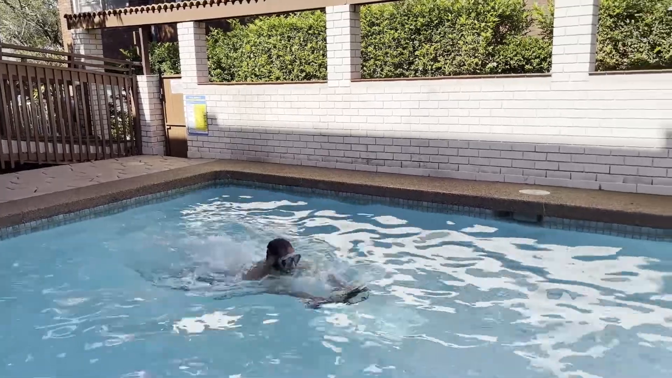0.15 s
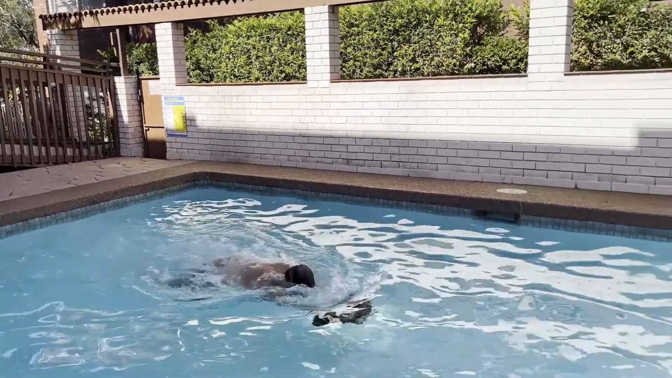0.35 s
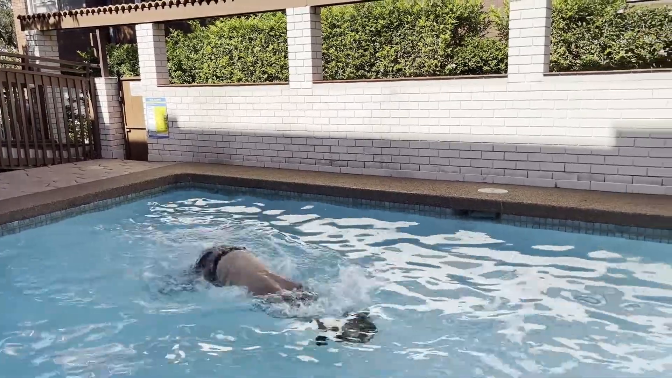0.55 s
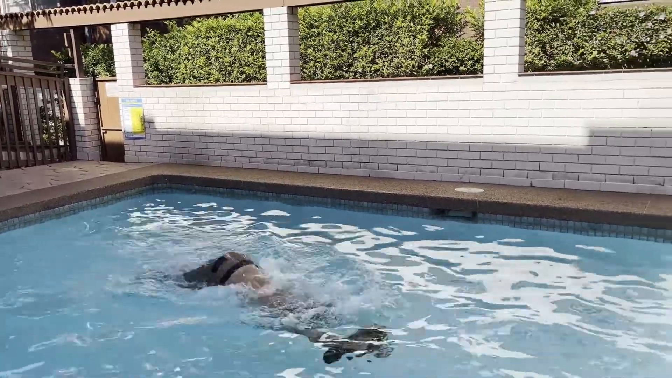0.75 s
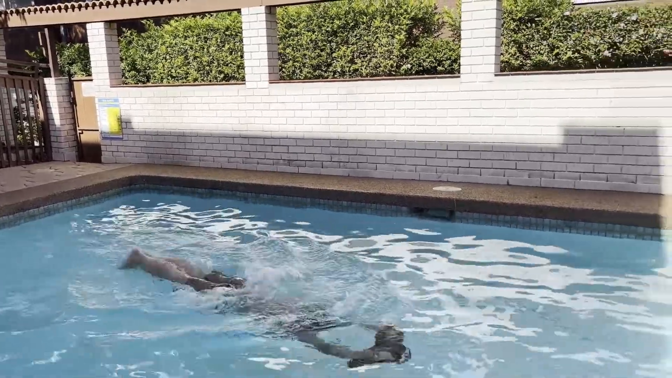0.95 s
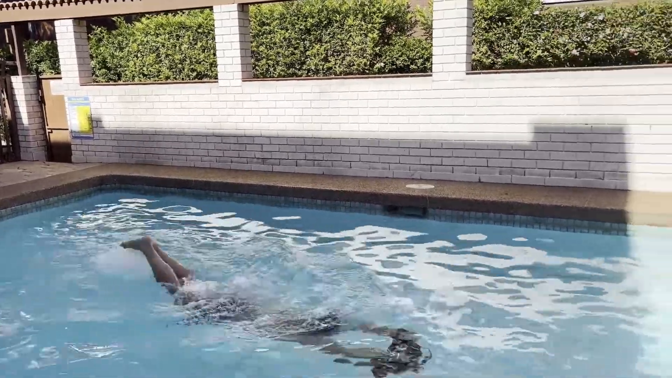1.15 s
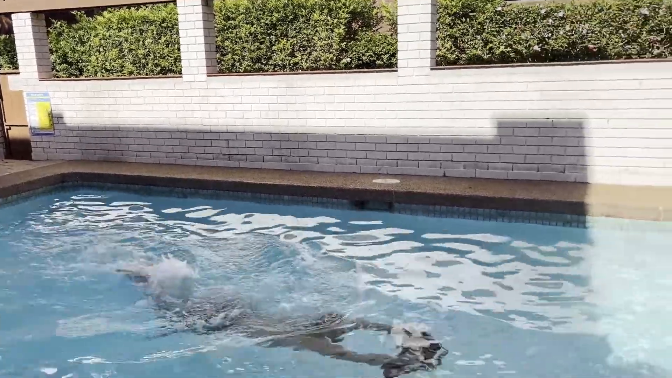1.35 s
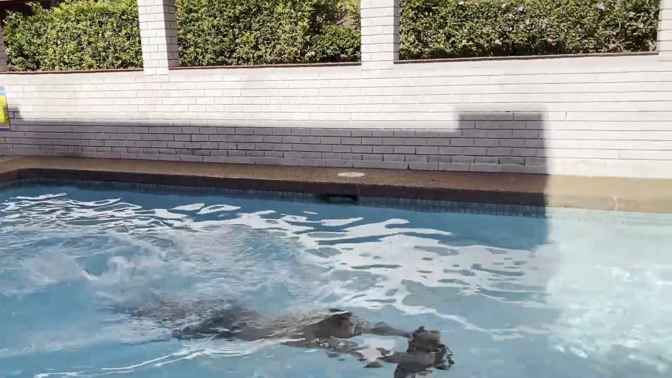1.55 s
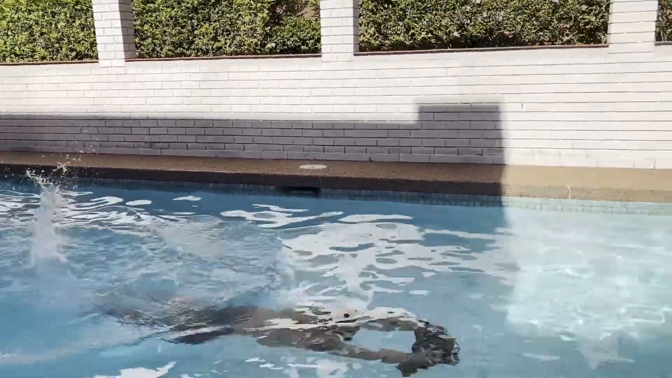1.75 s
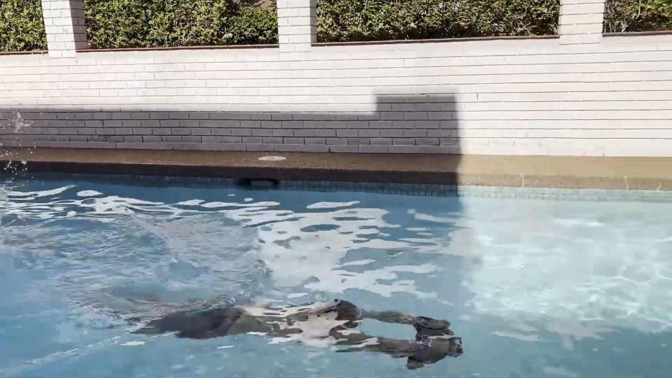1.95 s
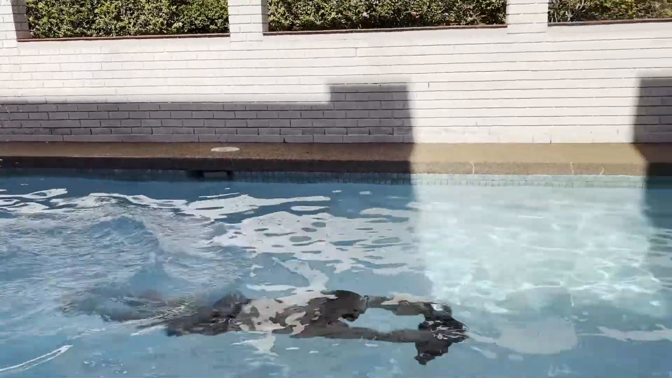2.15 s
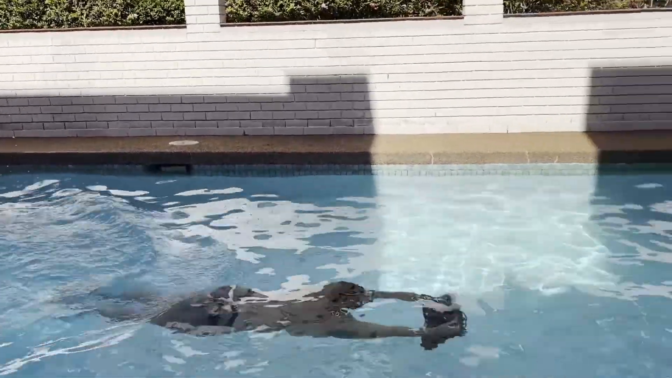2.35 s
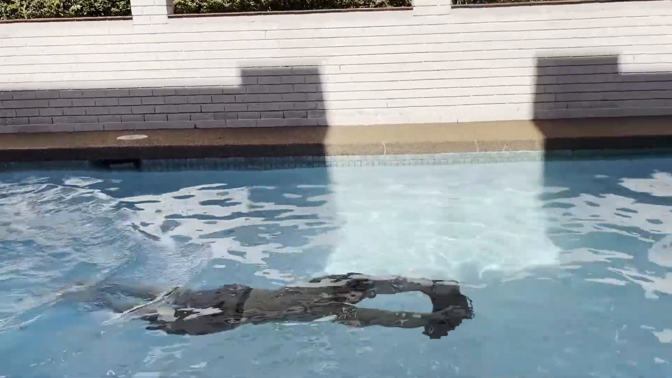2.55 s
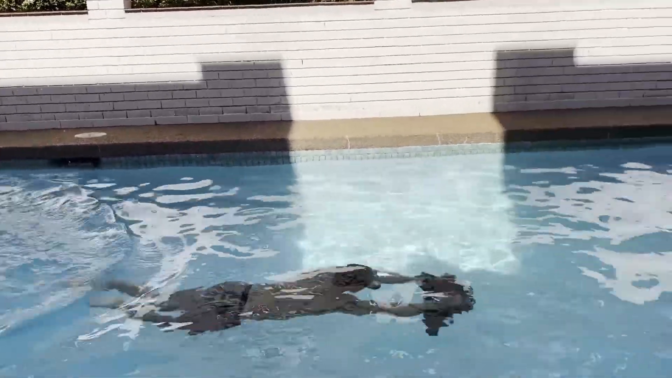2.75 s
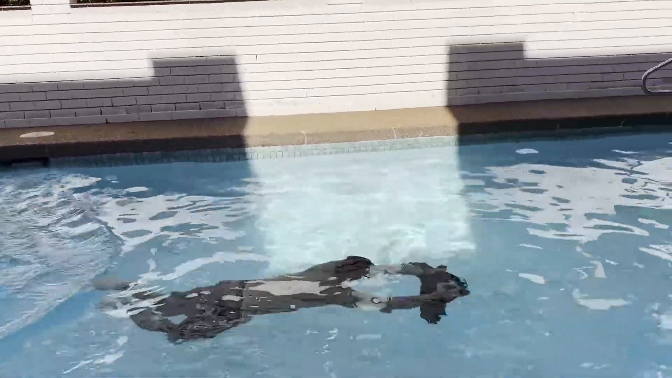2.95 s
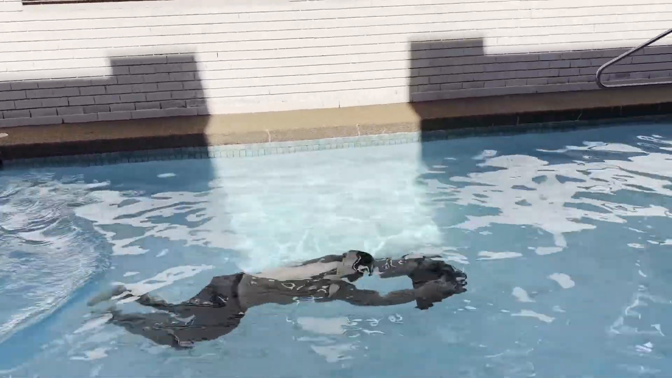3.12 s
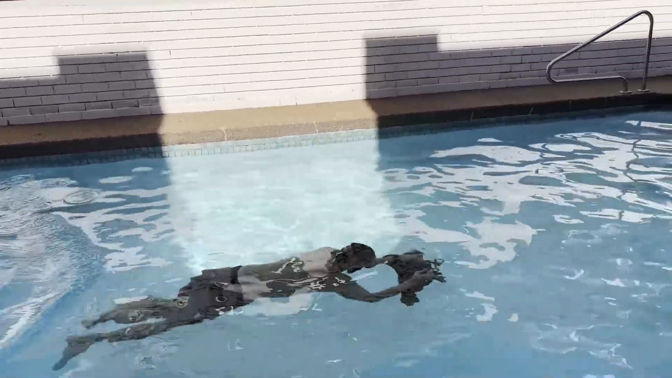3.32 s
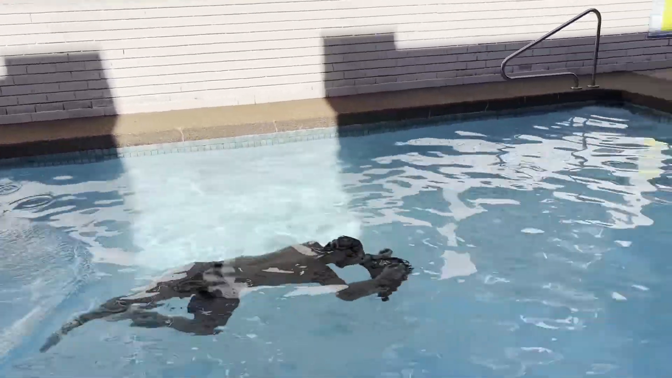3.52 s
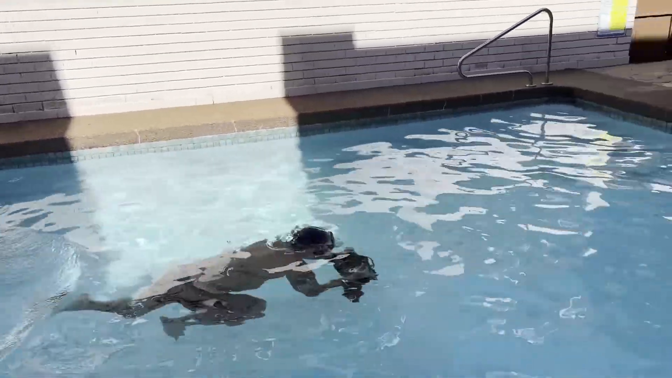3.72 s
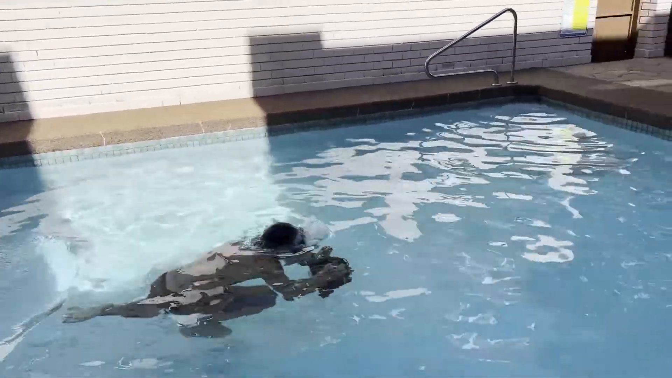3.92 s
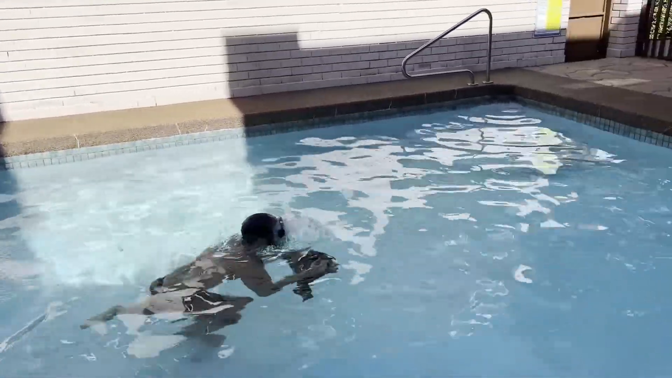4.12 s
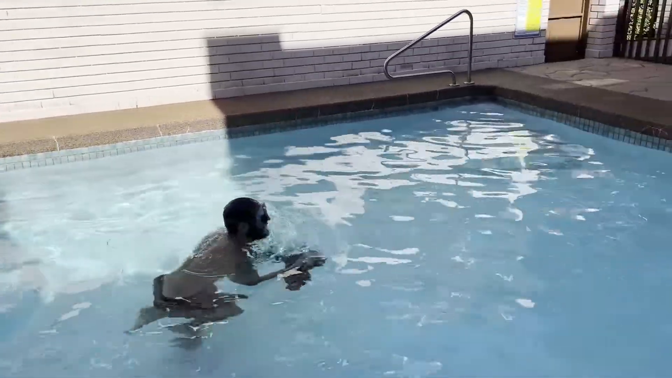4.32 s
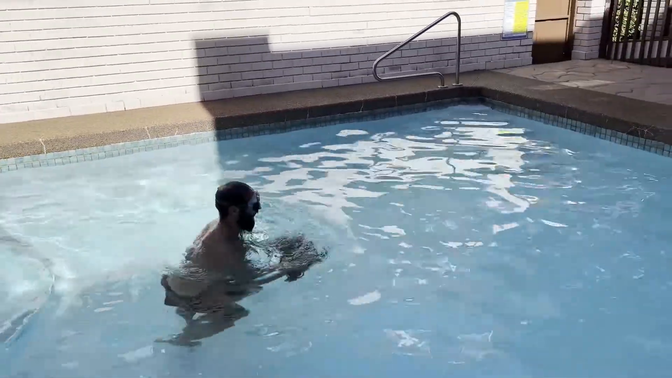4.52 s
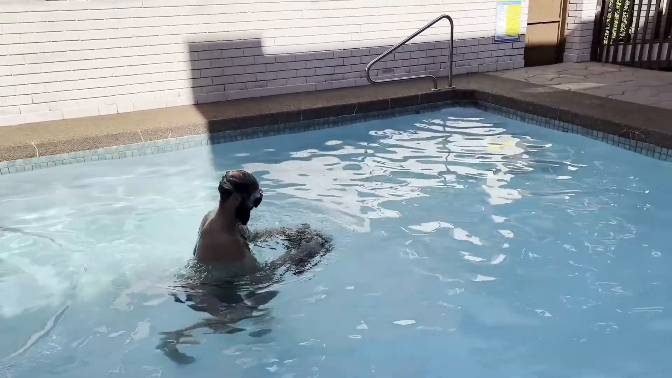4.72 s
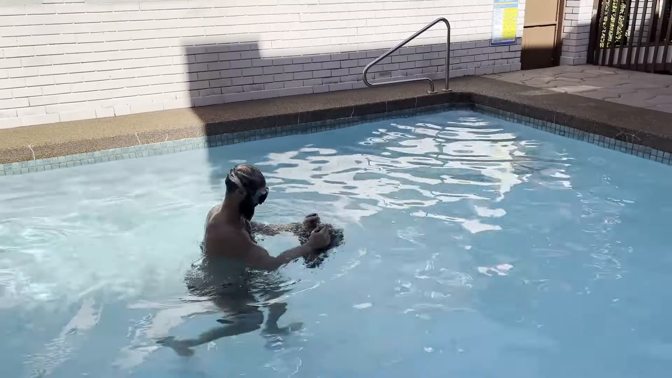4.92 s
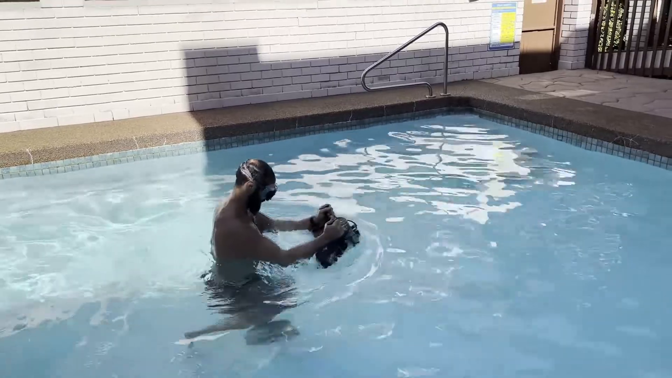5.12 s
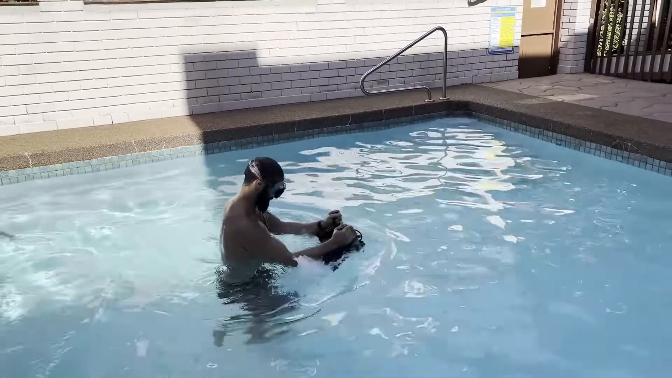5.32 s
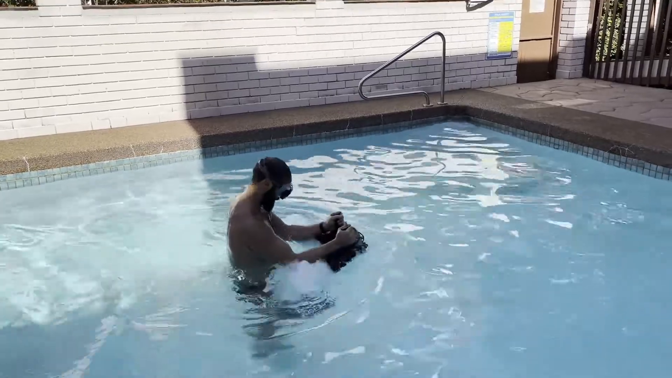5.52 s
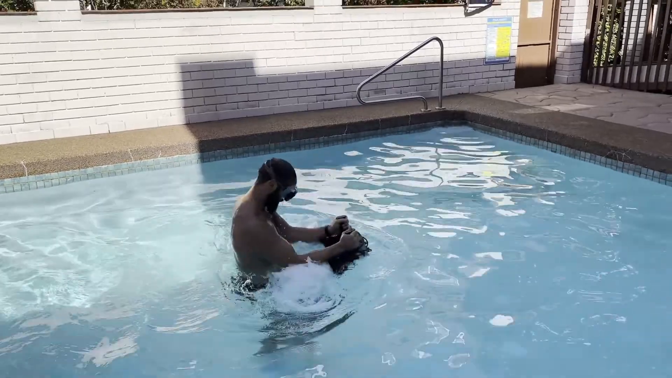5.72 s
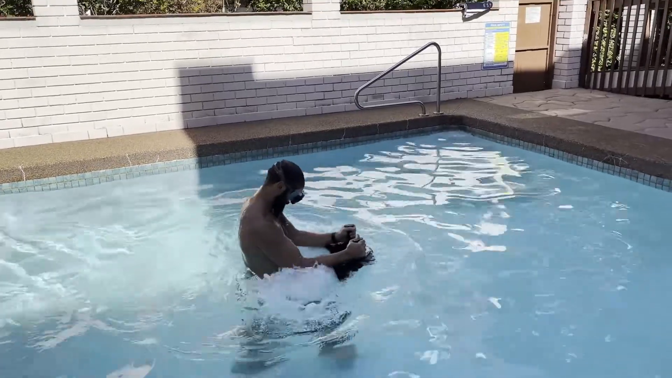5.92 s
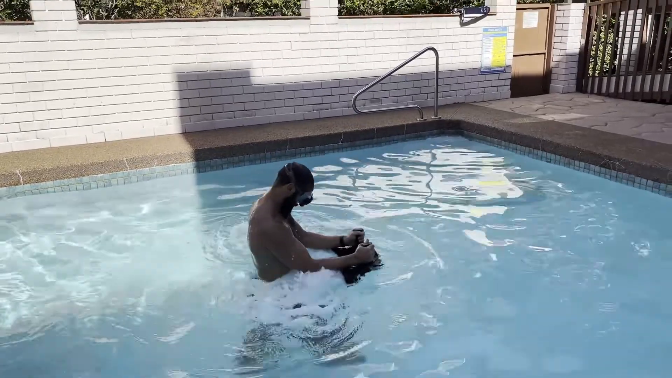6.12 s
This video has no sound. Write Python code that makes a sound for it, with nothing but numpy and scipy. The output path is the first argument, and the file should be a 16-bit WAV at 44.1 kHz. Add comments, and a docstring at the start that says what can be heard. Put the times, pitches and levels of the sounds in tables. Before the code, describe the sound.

Outdoors at a small walled pool, heard in wide stereo from the side, with a faint low rumble and thin hiss throughout. From 0 to 1.4 seconds water gurgles, slaps and bubbles around a diving swimmer; a low motor hum surfaces briefly near 0.1-0.3. The wash swells around 1.1-1.2, then at 1.6 a kick makes a deep, hollow plunk with a bassy tail. From 1.8 to 2.9 bright droplets patter and tiny bubbles tick, thinning to near quiet by 3.5, with a barely audible hoarse bird note. At 3.7-4.2 surfacing brings rising bloops, a gurgle and drips. Thin gliding bird calls sound around 4.4-4.9 among sparse drops. At 5.05 propellers abruptly break the surface: loud, heavy froth churns and bubbles unevenly to the end just after 6, with two wavering electric tones, one slightly higher, flaring in and out.

```python
"""A swimmer with two hand-held electric thrusters dives in a walled backyard pool, glides, and stands up.
At first water gurgles and splashes (resonant noise grains) over a far rumble, a faint hiss and a low
motor hum (wavering harmonics); bubbles (damped, rising sines) and drops (ticks with short rings) join.
After the kick, showers of droplets patter; later a bird calls in thin gliding tones. Last, propellers
suck air at the surface: heavy froth (grains again) churns while two blade tones come and go."""
import sys
import numpy as np
from scipy import signal
from scipy.fft import rfft, irfft, next_fast_len
from scipy.io import wavfile

SR = 44100
rng = np.random.default_rng(int(sys.argv[2]) if len(sys.argv) > 2 else 0)


def magnitude_from_level(level_db):
    """Linear magnitude for a level in decibels (20 dB per decade)."""
    exponent = np.asarray(level_db, float) / 20
    return 10 ** exponent


def unload_audio(sound):
    """Save the sound as a 16-bit wav file, at the path given as the first command line argument."""
    columns = np.transpose(np.atleast_2d(sound))
    # keep every value between -1 and 1, then stretch to whole-number steps
    steps = np.round(np.clip(columns, -1, 1) * 32767)
    wavfile.write(sys.argv[1], SR, steps.astype(np.int16))


N = 271849

# Moving water: t/s, nominal gurgle level/dB, spray above gurgle/dB
WATER = [(0.0, -39, -7.5), (0.3, -40, -6.5), (0.62, -37, -6.5), (0.92, -38.5, -8.5), (1.1, -35.5, -11),
         (1.16, -33, -11), (1.24, -36.5, -8.5), (1.33, -40, -6.5), (1.56, -42.5, -5), (1.7, -44.5, -2),
         (1.92, -50, -4.5), (2.2, -47, -0.5), (2.45, -53.5, 5.5), (2.7, -57.5, 10), (2.9, -58.5, 1.5),
         (3.2, -59, -4), (3.4, -59.5, -5.5), (3.66, -65.5, -4), (3.75, -58.5, -8), (3.85, -56, -7),
         (3.95, -51, -15), (4.1, -46, -9), (4.3, -53, -3.5), (4.55, -61, -2.5), (4.8, -57, -3.5),
         (5.04, -55.5, -6)]
# Slaps of limbs and waves: t/s, nominal gurgle level/dB, spray above gurgle/dB, amplitude fade to 1/e /s
SLAPS = [(.17, -40.5, -4, 0.093), (.44, -50, -16, 0.027), (.6, -39.5, -5.5, 0.11), (.69, -42, -7, 0.071),
         (1.08, -42, -33, 0.03), (1.22, -34.5, -20, 0.016), (1.352, -39.5, -0.5, 0.045),
         (1.623, -31, -9, 0.03), (1.65, -40, -12, 0.035), (1.79, -43, -10, 0.031), (2.1, -47.5, 3, 0.057),
         (2.6, -45, -5, 0.027), (3.72, -63, -28, 0.12), (3.855, -49.5, -7, 0.11), (3.927, -42, -4, 0.071),
         (4.186, -55, 5, 0.059), (4.337, -46.5, 4, 0.0069), (4.71, -58, 2, 0.044)]
# Froth from the propellers: t/s, churn level/dB, spray above churn/dB, splash lift/dB
FROTH = [(5.03, -66, -18, 12), (5.045, -41, -24, 10), (5.052, -34.5, -17, 4), (5.066, -22.5, -15.5, 2),
         (5.098, -17.5, -15.5, -9), (5.15, -22, -10.5, -4.5), (5.225, -24.5, -9, -9),
         (5.284, -18.5, -16.5, -4.5), (5.36, -25, -15, -11), (5.385, -21.5, -12.5, -6),
         (5.42, -25, -11, 5.5), (5.52, -23.5, -7, -6), (5.57, -19, -16.5, -4), (5.612, -21.5, -11, -2.5),
         (5.66, -21, -11.5, -0.5), (5.73, -23, -9.5, -1), (5.8, -26.5, -5.5, -0.5), (5.87, -25.5, -8, -1.5),
         (5.93, -25, -9, -3.5), (6.0, -25.5, -8, -4.5), (6.1, -27, -4.5, 0), (6.16, -21, -13.5, -4)]
# Relative noise spectra of the grain layers: f/Hz, level/dB per Hz
GURGLE_SPECTRUM = [(180, 7), (300, 3.5), (450, 4.5), (750, 10), (950, 5), (1150, 5), (1500, 1)]
SPLASH_SPECTRUM = [(1200, -19), (1600, 6), (2500, 9.5), (3100, -30), (4200, -5.5), (5500, -6.5)]
SPRAY_SPECTRUM = [(3000, 12.5), (4500, 12), (6000, -2.5), (7200, 8.5), (8500, 10.5), (9400, 3),
                  (10000, 10.5), (10700, 6), (11500, 4.5), (13000, 2.5), (14500, 5), (15800, 10)]
CHURN_SPECTRUM = [(150, -5), (220, -3), (310, -0.5), (420, -7.5), (550, -0.5), (770, 3), (1050, -1),
                  (1400, -23.5), (1900, -8), (2400, -27)]
TOWN_SPECTRUM = [(35, -10), (55, 0), (80, -10.5), (130, -11.5), (200, -20), (300, -25.5), (450, -30),
                 (900, -75), (1500, -79)]
AIR_SPECTRUM = [(4000, -11), (7000, -20), (10000, -5), (13000, 3), (15500, 7)]
DROPLET_SPECTRUM = [(1900, -30), (2500, 7), (3500, 7), (4500, 4.5), (6000, 2.5), (8000, -2.5)]
# Left-right correlation of the grains before any widening: f/Hz, correlation
CORRELATION = [(60, .99), (200, .98), (350, .96), (500, .88), (1000, .72), (1500, .52), (2500, .88),
               (4500, .78), (5600, .66), (6100, .72), (6600, .8), (8800, .8), (9500, .99), (10300, .99),
               (11000, .84), (14700, .84), (15300, .985)]
# Low rumble, swelling with the kick and the surfacing: t/s, level/dB before left-right balance
RUMBLE = [(0.0, -33), (0.25, -42.5), (0.5, -40), (1.1, -39), (1.4, -44.5), (1.63, -33.5), (1.8, -37),
          (1.94, -39), (2.7, -41.5), (3.5, -41.5), (3.93, -39), (4.3, -42.5), (5.2, -40), (5.45, -39.5),
          (6.16, -41.5)]
# Motors' slower hum while pushing under water: t/s, nominal f/Hz, nominal level/dB
THRUSTER_SUBMERGED = [(0.02, 186.5, -59), (0.12, 189.7, -40), (0.2, 188.6, -41.5), (0.3, 181, -62)]
# Blade tone, slower thruster: t/s, nominal f/Hz, nominal level/dB, second harmonic level/dB
THRUSTER_LOW = [(5.28, 259.3, -44, -62), (5.33, 257, -22, -27), (5.37, 259.9, -23, -36),
                (5.41, 263.4, -38, -40), (5.44, 267.4, -36, -38), (5.5, 269.4, -42, -29.5),
                (5.56, 270.7, -38, -36.5), (5.6, 274, -21, -27), (5.65, 267.5, -26, -31),
                (5.71, 269.4, -31.5, -28), (5.79, 267, -35.5, -50), (5.93, 265.6, -39.5, -35),
                (6.16, 268, -61, -36)]
# Blade tone, faster thruster: t/s, nominal f/Hz, nominal level/dB
THRUSTER_HIGH = [(5.13, 306.6, -38), (5.19, 314.3, -20), (5.258, 328.8, -43), (5.43, 294.7, -44),
                 (5.482, 300, -23), (5.52, 307.7, -20), (5.56, 319.6, -26), (5.599, 319, -32.5),
                 (5.8, 314.4, -66), (5.858, 306.2, -20), (5.9, 306.2, -42), (5.99, 311.3, -26),
                 (6.04, 310.4, -33.5), (6.16, 309, -31)]
# Large bubbles and air pockets, plus brief high rings of drops and whistles in the froth's spray: t/s, #
# nominal level/dB, starting f/Hz, t60/s, share by which the mean pitch over t60 exceeds the starting pitch
BUBBLES = [(.174, -32, 754, .05, 0.37), (.2, -41, 400, .08, 0), (.351, -30, 1875, 0.027, 0.024),
           (.4, -26.5, 620, 0.039, 0), (.585, -28.5, 325, 0.098, 0.34), (.61, -31, 700, 0.096, 0.13),
           (.687, -24.5, 713, 0.044, 0.3), (0.711, -22, 327, 0.056, 0.11), (.728, -25, 566, 0.035, 0.12),
           (.8, -30, 310, 0.086, 0), (.84, -29, 690, .04, 0.076), (.965, -33, 728, 0.066, 0.03),
           (1.047, -26, 890, 0.025, 0.067), (1.074, -24.5, 730, 0.055, 0), (1.088, -26, 312, 0.1, 0),
           (1.216, -27.5, 815, 0.055, 0.1), (1.27, -30, 940, 0.056, 0.19),
           (1.075, -25.5, 342.6, 0.2, 0.067), (1.372, -23, 375, 0.045, 0.013),
           (1.512, -26, 312, 0.15, 0.12), (1.515, -30, 198.5, 0.33, 0), (1.593, -10.5, 198.7, 0.091, 0.041),
           (1.61, -7, 208.2, 0.055, 0.19), (1.622, -20.5, 704, 0.074, 0.049), (1.625, -26, 485, 0.061, 0),
           (1.633, -14, 69, 0.13, 0.46), (1.69, -28, 60, 0.11, 0.043), (1.745, -14, 57.3, 0.09, 0),
           (1.8, -33, 59.4, .12, 0.044), (1.84, -25, 56, 0.11, 0), (1.655, -35, 1456, .04, 0.27),
           (1.69, -45, 910, 0.029, 0.21), (1.787, -27, 862, 0.032, 0.3), (1.815, -33, 815, 0.03, 0.15),
           (1.97, -41, 700, 0.064, 0.011), (2.0, -41, 910, 0.047, 0.002), (2.035, -43, 1590, .04, 0.084),
           (2.141, -38.5, 392, 0.21, 0.019), (2.054, -47, 6500, .02, .05), (2.084, -37, 5000, .025, .03),
           (2.109, -38, 7300, 0.023, 0.3), (2.134, -33, 984, .03, 0), (2.173, -39, 4530, .025, 0.085),
           (2.222, -40, 2300, .04, 0.26), (2.285, -38, 4150, 0.034, 0.15), (2.345, -36, 3800, 0.033, 0.09),
           (2.416, -42, 3700, .02, .05), (2.463, -38, 4600, .02, .05), (2.473, -37.5, 5000, 0.022, .03),
           (2.488, -44, 3100, .02, 0.14), (2.518, -39, 4910, 0.022, 0.24), (2.667, -40, 7300, .02, .03),
           (2.672, -42, 4070, .02, .03), (2.752, -49, 4000, 0.018, .15), (2.759, -38, 5640, .02, .1),
           (2.872, -47, 3570, .02, 0), (2.913, -44, 650, 0.044, 0), (2.944, -52, 848, .04, .05),
           (3.011, -38, 473, 0.042, 0.081), (3.014, -61, 5150, .025, .03), (3.14, -47, 1510, .025, 0.24),
           (3.168, -49, 2630, .025, 0), (3.208, -57, 4250, .025, .03), (3.245, -55, 1950, .04, 0.07),
           (3.288, -53, 2450, .04, .03), (3.3, -51, 960, 0.087, 0.13), (3.325, -55, 2700, .04, .02),
           (3.372, -51, 1700, .04, .02), (3.494, -48, 694, .04, 0), (3.51, -63, 1800, .04, .03),
           (3.543, -55, 835, .04, 0), (3.64, -50, 797, .04, .05), (3.703, -54, 810, .05, 0),
           (3.742, -46, 895, .05, 0.085), (3.752, -47, 1126, 0.056, 0.063), (3.772, -43, 559, .05, 0.11),
           (3.883, -38, 472, .04, 0.021), (3.9, -42, 1110, 0.058, 0.07), (3.93, -29.5, 670, 0.035, .1),
           (3.94, -34, 1010, .04, 0.03), (3.953, -36, 1610, 0.036, .03), (4.04, -31, 483, 0.046, 0.0078),
           (4.095, -45, 1360, .04, 0.14), (4.12, -36, 660, .04, 0), (4.147, -38, 1680, 0.035, .05),
           (4.197, -36, 900, .05, 0), (4.395, -46, 850, .04, .05), (4.46, -50, 1700, .04, .02),
           (4.5, -51, 995, .05, 0.035), (4.6, -49, 1550, 0.081, .05), (4.737, -47, 750, .06, 0),
           (4.768, -46, 1780, .025, .05), (4.83, -53, 3030, .03, .02), (4.877, -46, 1850, 0.027, .03),
           (4.88, -45, 830, 0.059, 0.18), (2.19, -31, 493, 0.049, 0), (2.23, -39, 593, 0.073, 0.12),
           (2.31, -38, 432, 0.25, 0.07), (2.40, -44, 714, 0.15, 0.043), (3.21, -45, 1350, .04, 0.067),
           (3.691, -27, 110, 0.08, 0.29), (3.744, -29, 116.3, 0.17, 0.37), (3.72, -48, 840, 0.12, 0.11),
           (3.77, -44, 683, 0.17, 0.17), (3.81, -39, 707, 0.07, 0.31), (3.855, -39, 625, 0.18, 0.28),
           (3.885, -27.5, 157.4, 0.12, 0.53), (3.91, -23.5, 217.8, 0.065, 0.17),
           (3.925, -17, 264, 0.058, 0.13), (3.948, -26, 324, 0.18, 0.035), (3.992, -27.5, 363, 0.1, 0.15),
           (3.989, -33, 1020, 0.044, 0.086), (4.01, -23, 420, 0.038, 0.042), (4.085, -34, 289, 0.19, 0.013),
           (4.145, -32, 687, .03, 0.047), (4.193, -28, 562, 0.025, 0.2), (4.596, -39, 1110, 0.041, 0.25),
           (4.622, -43, 1710, 0.028, 0.16), (4.814, -36.5, 964, 0.045, 0), (5.016, -39, 1190, 0.034, 0.31),
           (5.1, -15.5, 766, 0.13, 0.05), (5.12, -12, 171, 0.15, 0.13), (5.175, -22.5, 1760, 0.11, 0.094),
           (5.28, -23, 396, 0.065, 0.23), (5.4, -30, 2180, 0.093, 0.1), (5.44, -24, 2020, .06, 0.052),
           (5.485, -29, 6140, 0.063, 0.063), (5.5, -31.5, 6640, .07, 0.16), (5.52, -33, 6200, .06, .02),
           (5.53, -30, 6700, .05, 0), (5.29, -29, 2520, .05, 0.25), (5.2, -33, 7000, 0.03, .02),
           (5.41, -22.5, 577, 0.094, 0), (5.44, -27, 1695, 0.072, 0.077), (5.51, -27, 1113, 0.072, 0.043),
           (5.555, -24, 805, .08, 0.13), (5.6, -26, 520, .07, .02), (5.62, -19, 850, 0.064, 0.13),
           (5.64, -20, 1590, 0.092, 0.041), (5.655, -16, 1046, 0.077, 0.14), (5.69, -18.5, 722, 0.17, 0.6),
           (5.735, -22, 558, 0.082, 0.074), (5.77, -22.5, 880, 0.099, 0.11), (5.86, -26, 705, 0.069, 0),
           (5.95, -30, 706, 0.12, 0.11), (6.03, -26, 1045, 0.12, 0), (6.09, -27, 1858, 0.15, 0.028),
           (6.09, -19, 721.5, 0.056, 0.09), (5.07, -14, 722, 0.039, 0.68),
           (5.084, -13.5, 203.3, 0.25, 0.59), (5.097, -13, 467, 0.24, 0.14), (5.27, -13, 910, 0.11, 0.13),
           (5.31, -16.5, 754, 0.36, 0), (5.33, -20, 1020, 0.42, 0.06), (5.58, -18, 791, 0.091, 0),
           (5.601, -17.5, 1150, 0.15, 0.18)]
# Reflections from the yard walls: delay/s, level/dB before filtering
WALL_ECHOES = [(.019, -6.5), (.033, -9), (.047, -9.5)]
# Drops striking the surface: t/s, nominal level/dB, starting f/Hz, relative tick level/dB
DROPS = [(0.189, -39, 2310, -17), (0.2537, -33, 1440, -26), (.0428, -56, 2000, -20),
         (.0902, -53, 2000, -16), (0.125, -47.5, 2000, -8.5), (0.227, -50, 2500, -11),
         (.3516, -48, 2000, -13), (.381, -48, 2500, -17), (0.423, -29, 2510, -26), (.476, -53, 2500, -18),
         (.604, -44, 2500, -13), (.8744, -57, 2500, -10), (1.0286, -45, 2500, -10), (1.4915, -48, 2500, -9),
         (0.914, -31, 1860, -25), (1.359, -33, 1570, -19), (1.8104, -30, 3640, -38),
         (2.055, -46, 2390, -12), (2.073, -34, 2300, -28), (2.086, -34, 2280, -30), (2.111, -38, 2410, -11),
         (2.308, -29, 4200, -37), (2.51, -40, 4400, -19), (2.532, -28.5, 3380, -28),
         (2.518, -39, 4300, -26), (2.547, -32, 3600, -27), (2.556, -35, 4600, -28), (2.571, -33, 5200, -28),
         (2.49, -43, 2900, -30), (2.122, -35, 2400, -28), (2.252, -34, 2320, -35), (2.265, -38, 2470, -28),
         (2.675, -39, 3700, -21), (2.755, -41, 3500, -28), (2.763, -34, 5500, -23), (2.873, -41, 3530, -20),
         (2.791, -42, 2500, -22), (2.8, -43, 2400, -25), (2.86, -49, 2300, -30), (2.385, -42, 2310, -30),
         (2.345, -35, 2200, -32), (2.58, -38, 3200, -30), (2.615, -36, 3000, -30), (2.69, -40, 3600, -30),
         (2.599, -33, 2210, -27), (2.654, -34, 3270, -18), (2.833, -34, 5060, -34),
         (2.9753, -41, 2660, -34), (2.9921, -51, 2890, -11), (3.0115, -61, 2790, 3),
         (3.1033, -39, 1570, -41), (3.104, -48, 2200, -39), (3.146, -51, 1520, -14),
         (3.233, -64.5, 1660, 4.5), (3.515, -62, 1700, -7), (3.722, -45, 3100, -20),
         (3.7225, -53, 4300, -40), (3.723, -48, 5800, -40), (3.773, -43, 3400, -30),
         (3.802, -53, 5300, -28), (3.854, -46, 3000, -34), (4.685, -52, 4150, -35), (4.755, -42, 4500, -35),
         (4.756, -47, 3300, -40), (3.75, -45, 2660, -31), (3.7736, -56, 1510, -14),
         (3.8806, -49, 1800, -15), (3.931, -46, 2500, -16), (3.946, -32, 2660, -29),
         (3.9624, -19.5, 2380, -58), (4.123, -32.5, 2500, -41), (4.3444, -32.5, 2280, -26),
         (4.7541, -46, 2230, -27), (4.901, -50, 4730, -15), (4.94, -40, 4200, -26), (5.033, -36, 1620, -44)]
# Showers falling back after the kick and running off the body: t/s, nominal level/dB,
# amplitude fade to 1/e /s
PATTER = [(1.79, -44.5, 0.034), (2.08, -46, 0.11), (2.281, -47, 0.1), (2.45, -56, 0.17), (2.5, -45, .05),
          (2.525, -46, 0.044), (2.555, -45, 0.064), (2.595, -50, 0.022), (2.335, -43, 0.015),
          (2.14, -57, 0.051), (2.65, -41, 0.015), (2.754, -55, 0.017), (2.83, -51, 0.026), (2.97, -70, .08),
          (3.1, -62, 0.066), (3.72, -69, 0.018), (3.77, -63, 0.016), (3.85, -71, 0.06), (3.945, -45, 0.044),
          (4.12, -54, 0.081), (4.338, -54, 0.033), (4.75, -59, 0.06), (4.93, -62, .03)]
# Bird calls, one table each: t/s, nominal f/Hz, nominal level/dB, second harmonic level/dB
BIRD_CALLS = [
    [(3.41, 2780, -86, -76), (3.46, 2730, -70, -71), (3.59, 2680, -83, -78), (3.64, 2740, -87, -84)],
    [(4.44, 2330, -66, -76), (4.46, 2280, -59, -71), (4.5, 2260, -73, -70), (4.55, 2270, -84, -82)],
    [(4.51, 2440, -83, -73), (4.555, 2414, -60, -63), (4.585, 2430, -71, -57), (4.615, 2430, -61, -69),
     (4.645, 2430, -63, -68), (4.7, 2400, -69, -64), (4.75, 2440, -62, -71), (4.79, 2460, -69, -74),
     (4.84, 2400, -68, -78), (4.88, 2430, -78, -82)],
    [(4.62, 2410, -63, -76), (4.665, 2390, -56, -58), (4.69, 2300, -56, -68), (4.71, 2240, -55, -80),
     (4.74, 2230, -65, -82), (4.78, 2190, -66, -80)],
]
# Phase lag of the left port behind the right: f/Hz, lag/rad
PORT_LAG = [(7300, 0), (9500, 2.9), (10250, 3.35), (12200, 6.1), (13600, 6.9), (15200, 9.3), (16100, 9.45)]

# Splash level/dB grows a little faster than the water level about this pivot/dB
PIVOT_DB, SPLASH_FOLLOWS_LEVEL, SPLASH_FOLLOWS_SPRAY = -11.5, 1.02, 0.6


def rms_one(x):
    """Normalise the mean power to 1."""
    return x / np.sqrt(np.mean(x ** 2) + 1e-20)


def in_time(rows, edge_s=0.008):
    """Linear interpolation in time, led by a gate open over the table's span with short outer ramps."""
    s, *columns = np.transpose(rows)
    t = np.arange(N) / SR
    gate = np.clip(np.minimum(t - s[0], s[-1] - t) / edge_s + 1, 0, 1)
    return [gate] + [np.interp(t, s, column) for column in columns]


def at_hz(points, hz):
    """Interpolation on a logarithmic frequency axis."""
    table_hz, values = np.transpose(points)
    return np.interp(np.log(hz), np.log(table_hz), values)


def drift(rate_hz):
    """Low-pass noise: two equal poles smooth white noise into a random drift of about unit rms."""
    step = 40   # samples between drift values
    r = np.exp(-2 * np.pi * rate_hz * step / SR)
    white = rng.standard_normal(N // step + 2002)
    slow = signal.lfilter([1], [1, -2 * r, r * r], white)[2000:]   # skip the filter's onset
    return np.interp(np.arange(N) / step, np.arange(len(slow)), rms_one(slow))


def grains(spectrum, per_s, size_db, cycles, patchy_db, patch_hz):
    """Shot noise exciting resonators of quality factor `cycles`, each flickering; stereo, rms 1."""
    low, high = spectrum[0][0], spectrum[-1][0]
    centres_hz = np.geomspace(low, high, int(5 * np.log2(high / low)) + 1)
    born = rng.random((2, 2, N)) < per_s / SR
    strength = rng.standard_normal((2, 2, N))
    size = magnitude_from_level(size_db * np.minimum(rng.exponential(1, (2, 2, N)), 4))
    impulses = born * strength * size + 1e-12
    out, together = 0, drift(patch_hz)
    for k, hz in enumerate(centres_hz):
        r, w = np.exp(-np.pi * hz / max(cycles, 1) / SR), 2 * np.pi * hz / SR
        # Two impulse sets, shifted in time, serve all the bands
        drive = np.roll(impulses[k % 2], 997 * (k // 6), axis=1)
        mid, side = signal.lfilter([1, 0, -1], [1, -2 * r * np.cos(w), r * r], drive) * (1 - r * r)
        alike = np.clip(at_hz(CORRELATION, hz), 0, 1)
        flicker_db = patchy_db * (.3 * together + drift(2 * patch_hz))
        gain = magnitude_from_level(at_hz(spectrum, hz) + flicker_db)
        out = out + gain * (np.sqrt(1 + alike) * mid + np.sqrt(1 - alike) * side * [[1], [-1]])
    edges_hz = [.8 * low, min(1.2 * high, .45 * SR)]
    band = signal.butter(3, edges_hz, "band", fs=SR, output="sos")
    return rms_one(signal.sosfilt(band, out))


def widen(x, side_db):
    """Mid-side stereo: a stronger difference signal widens the image."""
    mid, side = (x[0] + x[1]) / 2, (x[0] - x[1]) / 2 * magnitude_from_level(side_db)
    return np.array([mid + side, mid - side])


def balance(left_db):
    """Level difference between the ears places a sound: left over right, shared by both channels."""
    return magnitude_from_level([[left_db / 2], [-left_db / 2]])


def burst(s, rise_s, fade_s):
    """Power envelope of a struck medium: a short quadratic rise, then exponential decay."""
    t = np.maximum(np.arange(N) / SR - s, 0)
    rise = np.minimum(t / max(rise_s, .002), 1) ** 2
    return rise * np.exp(-2 * np.maximum(t - rise_s, 0) / max(fade_s, .005))


def layer_gains(level_db, spray_db, lift_db):
    """Gains of gurgle, splash and spray; splash level depends on both water level and spray ratio."""
    splash_db = PIVOT_DB + SPLASH_FOLLOWS_LEVEL * (level_db - PIVOT_DB)
    splash_db = splash_db + lift_db + SPLASH_FOLLOWS_SPRAY * spray_db
    return magnitude_from_level(np.array([level_db, splash_db, level_db + spray_db]))


def add(out, s, sound):
    """Superposition: add a short sound from a given time onward."""
    i = round(s * SR)
    out[..., i:i + sound.shape[-1]] += sound[..., :N - i]


def wavering_tone(rows, waver, waver_hz, rough_db):
    """Frequency modulation: phase integrates a randomly wavering pitch for one or two harmonics."""
    gate, hz, *levels_db = in_time(rows)
    phase = 2 * np.pi * np.cumsum(hz * (1 + waver * drift(waver_hz))) / SR
    tone = sum(magnitude_from_level(level_db) * np.sin((k + 1) * phase + k) for k, level_db in enumerate(levels_db))
    return np.sqrt(2) * gate * tone * magnitude_from_level(rough_db * drift(waver_hz))


def water():
    """Entrained-air noise: pool and froth share splash and spray grains, froth having a heavier gurgle."""
    splash_lift_db, spread_db, left_db = -2, 5, 1.5   # pool only: it is wider than the froth
    slap_rise_s = 0.012
    calm, *calm_db = in_time(WATER)
    churned, *churned_db = in_time(FROTH)
    gurgle = grains(GURGLE_SPECTRUM, per_s=1600, size_db=1.5, cycles=10, patchy_db=1.8, patch_hz=3)
    churn = grains(CHURN_SPECTRUM, per_s=2400, size_db=2.5, cycles=8, patchy_db=1.8, patch_hz=4)
    splash = grains(SPLASH_SPECTRUM, per_s=3000, size_db=1.5, cycles=11, patchy_db=2.2, patch_hz=5)
    spray = grains(SPRAY_SPECTRUM, per_s=8000, size_db=2.5, cycles=9, patchy_db=2.8, patch_hz=4)
    power = layer_gains(*calm_db, splash_lift_db) ** 2
    for s, peak_db, spray_db, fade_s in SLAPS:
        slap_power = layer_gains(peak_db, spray_db, splash_lift_db)[:, None] ** 2
        power = power + slap_power * burst(s, slap_rise_s, fade_s)
    pool = sum(gain * layer for gain, layer in zip(np.sqrt(power), (gurgle, splash, spray)))
    froth = sum(gain * layer for gain, layer in zip(layer_gains(*churned_db), (churn, splash, spray)))
    return calm * widen(pool, spread_db) * balance(left_db) + churned * froth


def rumble():
    """Dense low-frequency noise: far traffic and pumps merge smoothly, leaning to the right."""
    gate, level_db = in_time(RUMBLE)
    town = grains(TOWN_SPECTRUM, per_s=18000, size_db=-1.5, cycles=35.0, patchy_db=-1.36, patch_hz=0.94)
    return magnitude_from_level(level_db) * balance(-1.5) * town


def air():
    """Broadband ambient noise: a faint, even treble hiss of the yard."""
    hiss = grains(AIR_SPECTRUM, per_s=20000, size_db=0.5, cycles=4.0, patchy_db=1.2, patch_hz=3.0)
    return magnitude_from_level(-68) * hiss


def thrusters():
    """Periodic blade loading gives harmonic tones, shaken as the load jumps between water and air."""
    tables = THRUSTER_LOW, THRUSTER_HIGH, THRUSTER_SUBMERGED
    return sum(wavering_tone(rows, waver=0.014, waver_hz=40.0, rough_db=4) for rows in tables)


def small_bubbles():
    """Random bubble formation: uniform times, log-uniform pitches, levels following the water."""
    count, low_hz, high_hz = 320, 350.5, 5000
    cycles_to_t60, rise = 16.6, 0.07
    when, size, strength = rng.random((count, 3)).T
    when, hz = when * N / SR, low_hz * (high_hz / low_hz) ** size
    calm_db = np.interp(when, *np.transpose(WATER)[:2]) - 2.5
    froth_db = np.interp(when, *np.transpose(FROTH)[:2]) - 10.5
    treble_lift_db = np.log2(hz / low_hz)   # 1 dB per octave
    peak_db = np.maximum(calm_db, froth_db) + treble_lift_db + 13.0 * (strength - .5)
    return [(s, db, f, cycles_to_t60 / f, rise) for s, db, f in zip(when, peak_db, hz)]


def bubbles():
    """Volume resonance: damped sines rise as bubbles near the surface, shaken by turbulence."""
    scatter_db, wide_above_hz = 6.5, 1000   # deeper-pitched bubbles differ less between left and right
    out, rows = np.zeros((2, N)), BUBBLES + small_bubbles()
    shake = .7 * np.tile(drift(45), 2)   # phase/rad, drifting at 45 Hz
    for (s, peak_db, hz, t60, rise), place in zip(rows, rng.standard_normal(len(rows))):
        t60 = max(t60, .005)
        t = np.arange(int(1.2 * t60 * SR)) / SR
        swell = (1 - np.exp(-t * hz / 1.2)) * magnitude_from_level(-60 * t / t60)
        own_shake = shake[int(hz * 97) % N:][:len(t)]
        ring = np.sin(2 * np.pi * hz * t * (1 + rise * t / t60) + own_shake)
        pan = balance(scatter_db * min(hz / wide_above_hz, 1) * place)
        add(out, s, pan * magnitude_from_level(peak_db) * swell * ring)
    return out


def walls(x):
    """Specular reflection: a few delayed echoes on alternating sides, dull and thin in the bass."""
    out, dull = np.zeros((2, N)), signal.lfilter([.3], [1, -.7], x)
    low_cut = signal.butter(2, 370, "high", fs=SR, output="sos")
    thin = signal.sosfilt(low_cut, dull)
    for k, (lag_s, level_db) in enumerate(WALL_ECHOES):
        add(out[k % 2], lag_s, magnitude_from_level(level_db) * thin)
    return out


def drops():
    """Impact and resonance: each drop gives a bright noise tick and a tiny bubble's short rising ring."""
    left_db, scatter_db = 1.5, 7.5   # mean and spread of the left-right level
    out, t = np.zeros((2, N)), np.arange(1500) / SR
    noise = rng.standard_normal((len(DROPS), len(t)))
    pans_db = left_db + scatter_db * noise[:, 0]
    for (s, peak_db, hz, bright_db), pan_db, hiss in zip(DROPS, pans_db, noise):
        tick = 10.3 * magnitude_from_level(bright_db) * np.diff(hiss, prepend=0) * np.exp(-t / 0.0026)
        ring = np.sin(2 * np.pi * hz * t * (1 + 11.5 * t)) * np.exp(-t * hz / 5.4)
        puff = 0.078 * hiss * np.exp(-t / 0.0024)
        add(out, s, magnitude_from_level(peak_db - 2.5) * (tick + ring + puff) * balance(pan_db))
    return out


def patter():
    """Superposed random impacts: crisp droplet grains under showers whose powers add."""
    grain = grains(DROPLET_SPECTRUM, per_s=1900, size_db=4, cycles=7.0, patchy_db=2.5, patch_hz=8)
    power = sum(magnitude_from_level(peak_db) ** 2 * burst(s, 0.015, fade_s) for s, peak_db, fade_s in PATTER)
    return widen(grain, 4.5) * np.sqrt(power)


def bird():
    """Gliding harmonic tones: thin far calls, the first fainter and hoarse through faster pitch waver."""
    wavers = (.04, 260), (.01, 80), (.007, 80), (.01, 80)   # (pitch share, rate/Hz) of each call
    calls = zip(BIRD_CALLS, wavers)
    return sum(wavering_tone(rows, waver=share, waver_hz=hz, rough_db=3.5) for rows, (share, hz) in calls)


def scene():
    """Linear superposition of the yard's sources, with wall echoes of the discrete ones."""
    near = bubbles() + thrusters() + bird() + drops()
    return water() + patter() + rumble() + air() + near + walls(near.mean(axis=0))


def band_limit(x):
    """A steep low-pass at the top of the band."""
    return signal.sosfilt(signal.butter(12, 16500, fs=SR, output="sos"), x)


def record(dry):
    """Interaural-type phase: in the treble the left port lags increasingly with pitch; the top is cut."""
    top_hz = 15780
    size = next_fast_len(N + 512)
    hz = np.arange(size // 2 + 1) * SR / size
    lag = np.interp(hz, *np.transpose(PORT_LAG))
    phase_turn = np.exp(.5j * lag * np.array([[-1], [1]]))   # half the lag on each side
    top_cut = np.clip((top_hz - hz) / 100, .01, 1)
    mix = irfft(rfft(dry, size) * phase_turn * top_cut, size)[:, :N]
    return band_limit(mix)


dry = scene()
out = record(dry)
unload_audio(out)
```